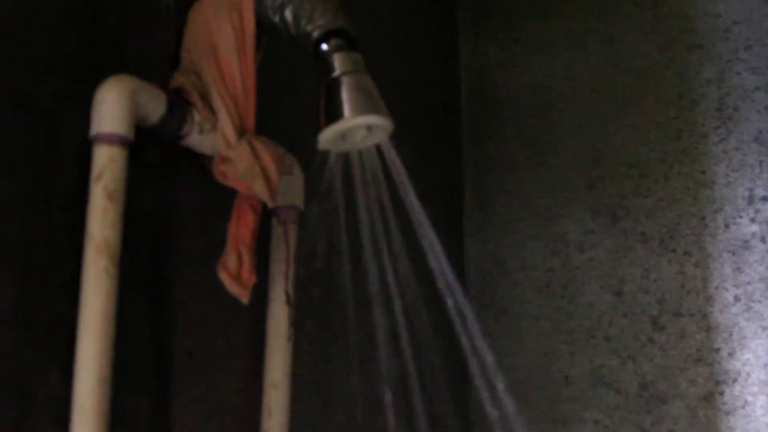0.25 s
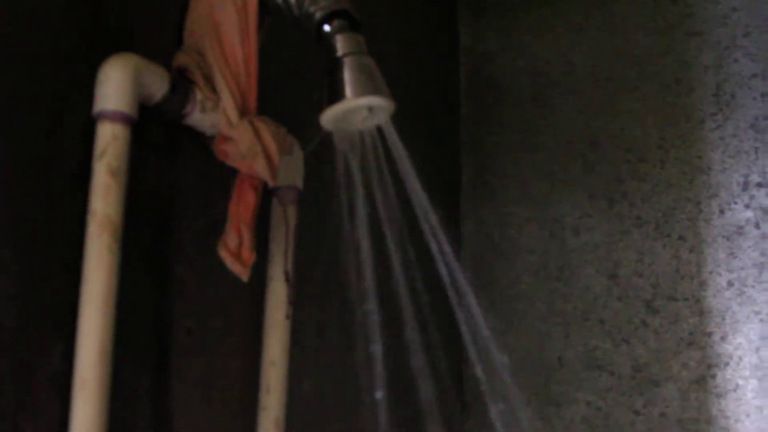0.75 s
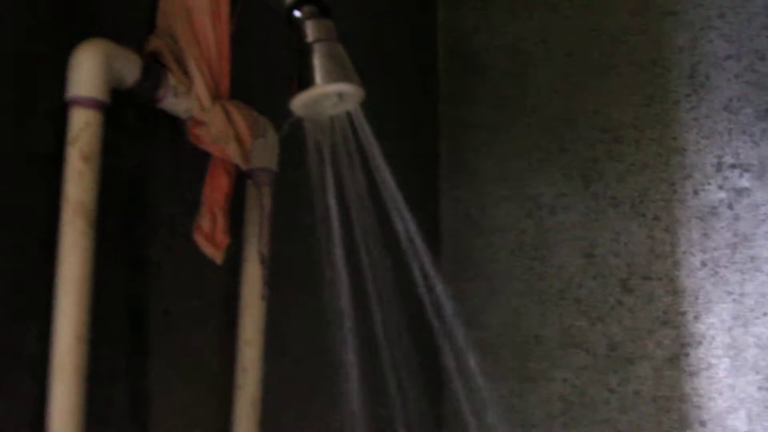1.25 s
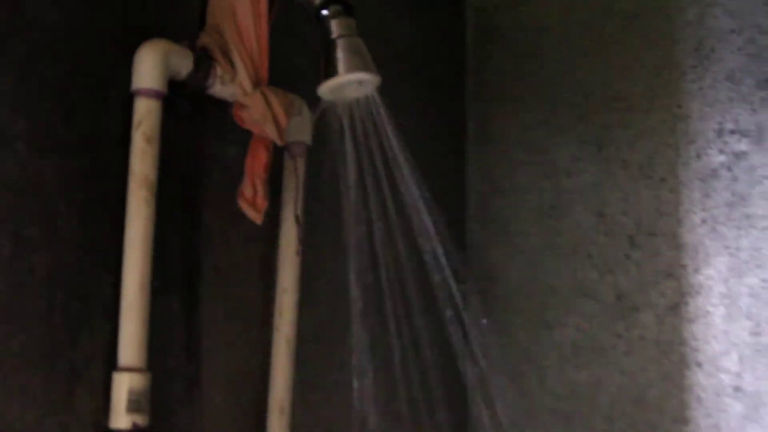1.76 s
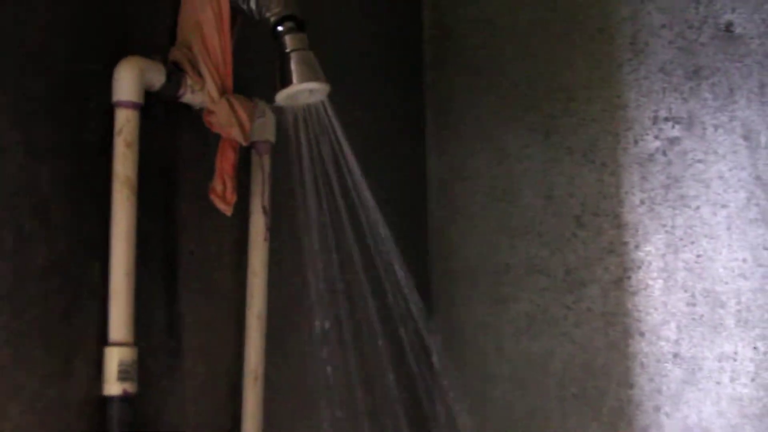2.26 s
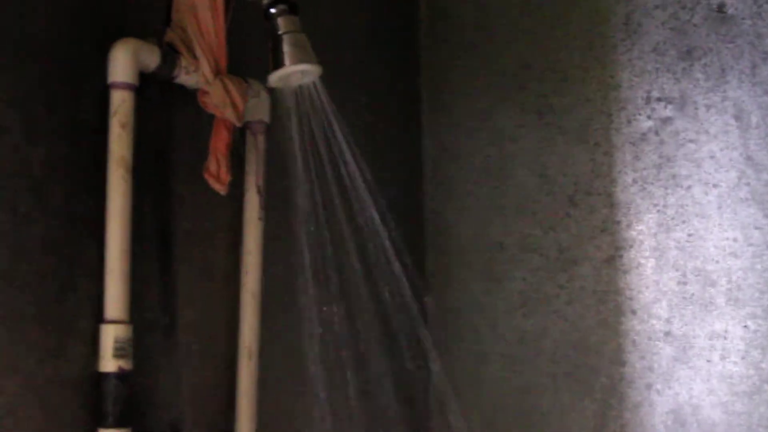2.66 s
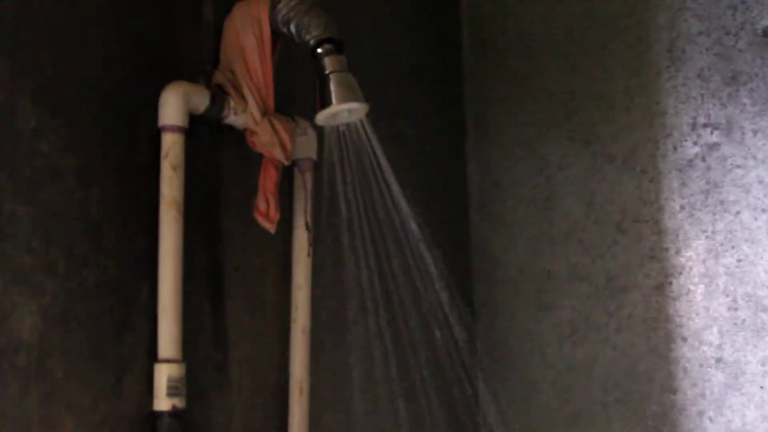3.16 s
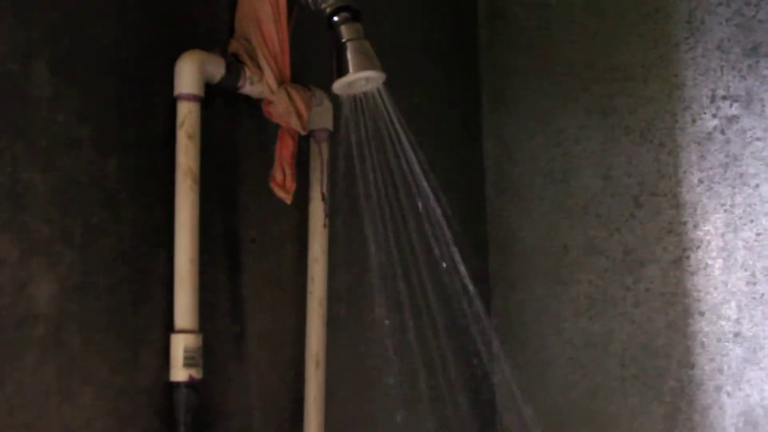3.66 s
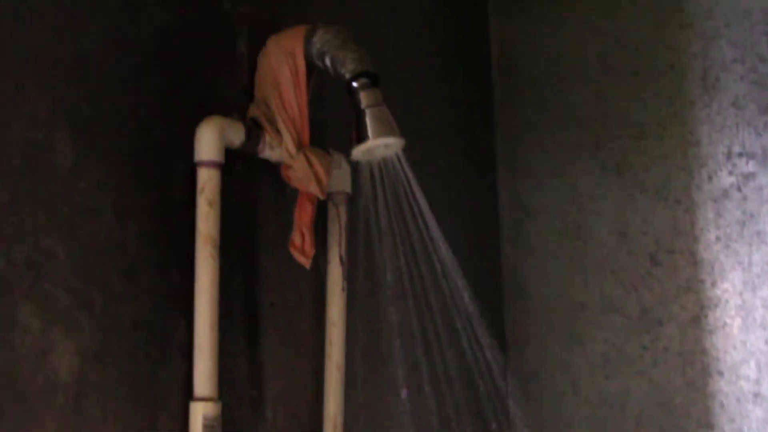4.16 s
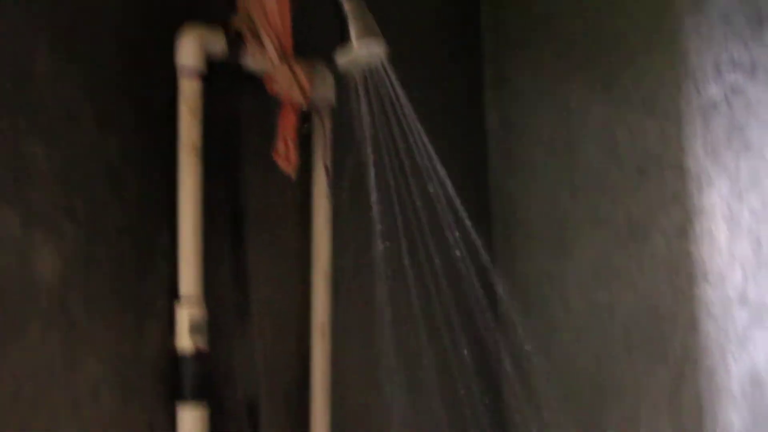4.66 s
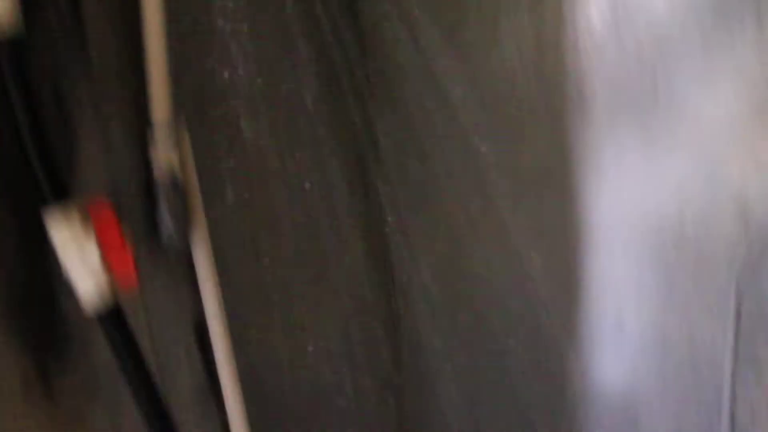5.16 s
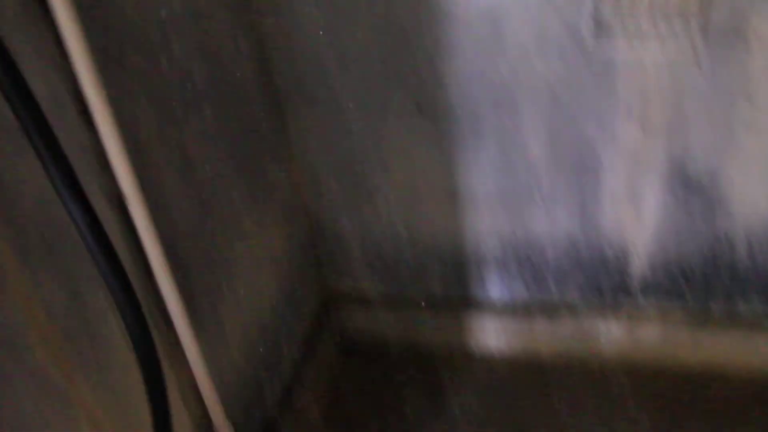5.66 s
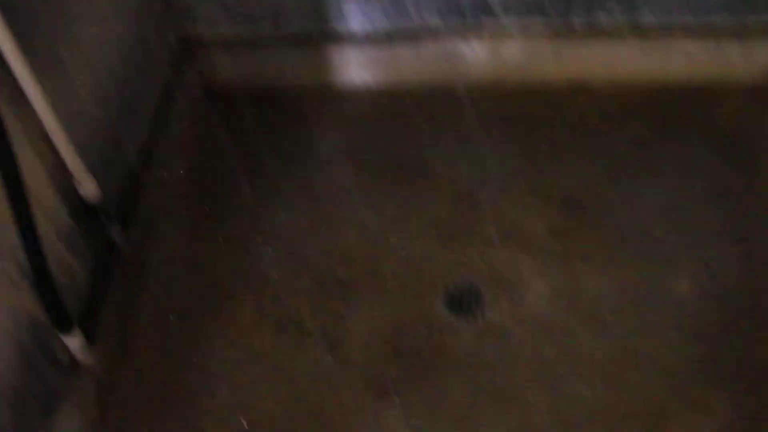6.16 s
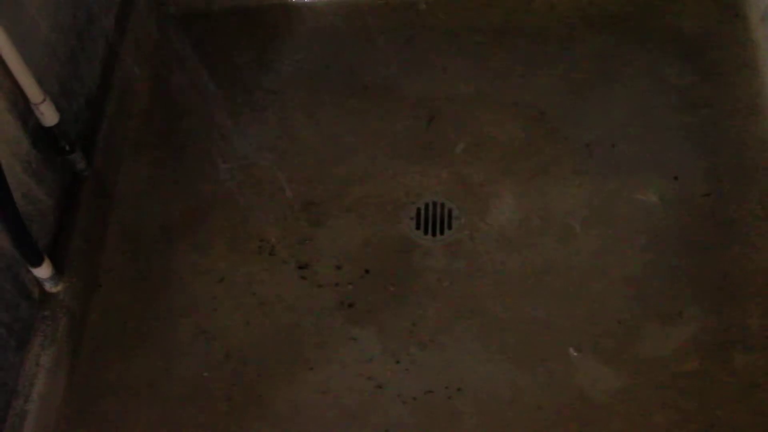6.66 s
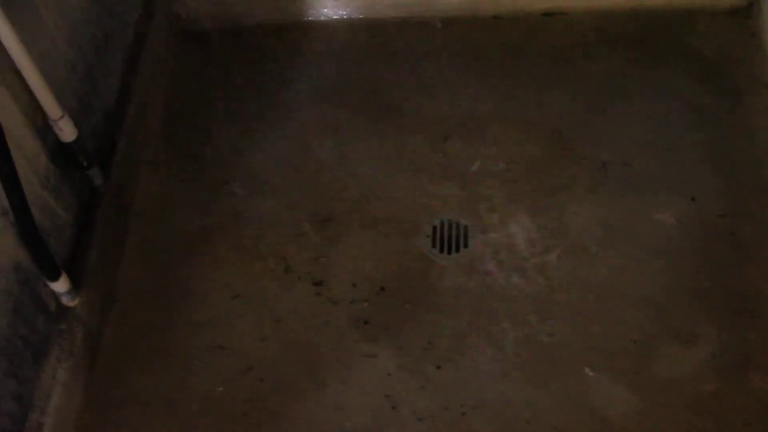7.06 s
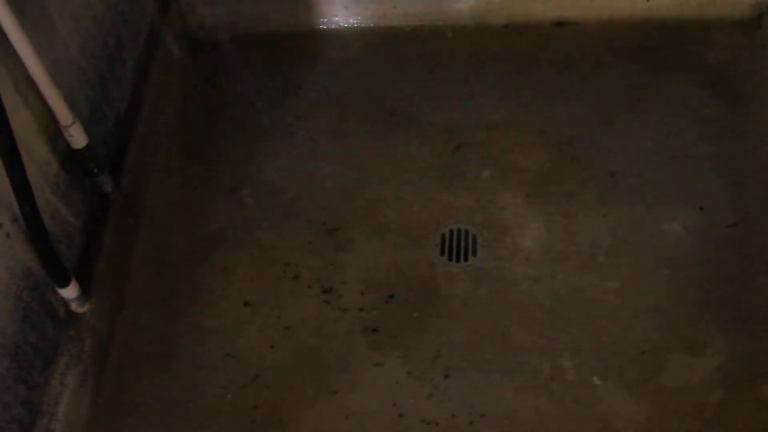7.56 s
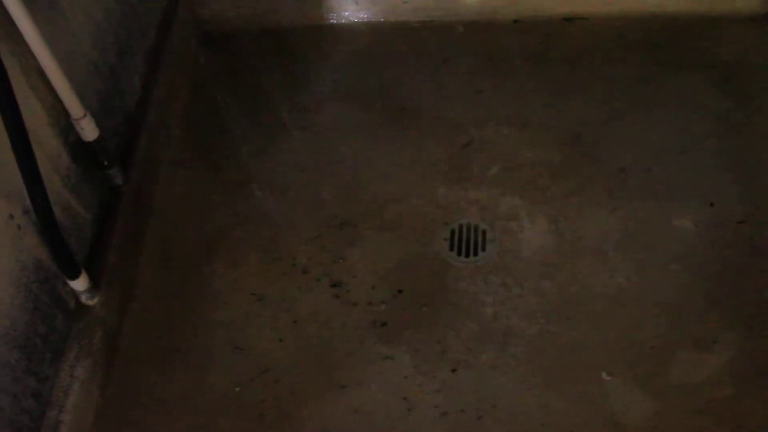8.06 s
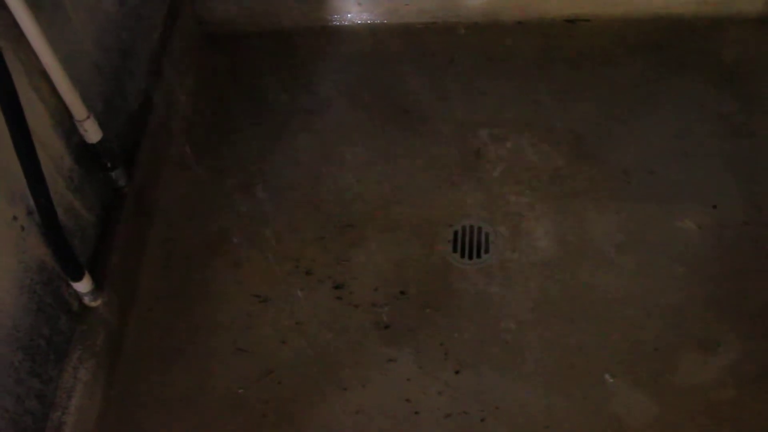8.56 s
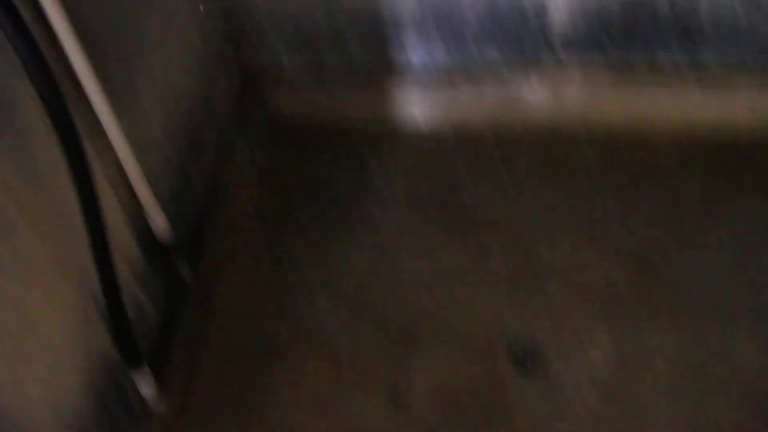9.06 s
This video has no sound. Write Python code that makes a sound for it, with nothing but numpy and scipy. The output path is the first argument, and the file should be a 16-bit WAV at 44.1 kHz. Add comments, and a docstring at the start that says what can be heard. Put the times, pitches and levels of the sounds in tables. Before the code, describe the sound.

Fizzing shower spray with uneven pressure slaps and splashes into a shallow puddle on concrete in a small bathroom.

```python
"""Sputtering shower on concrete

A shower on uneven pressure hits a bare concrete floor. Fine drops fizz, trapped air chokes the flow
and bursts out in spurts, and heavier slugs slap the puddle. The hard room answers and hums at its low
modes; something thuds softly far off in the building. One small microphone hears it all, and the water
turns hollow for about two seconds while it tips into the floor corner."""
import sys
import numpy as np
from scipy import signal
from scipy.fft import rfft, irfft, next_fast_len
from scipy.io import wavfile
from scipy.ndimage import uniform_filter1d, minimum_filter1d

SR = 44100
rng = np.random.default_rng(int(sys.argv[2]) if len(sys.argv) > 2 else 0)


def file_out(sig):
    """Save sig as 16-bit WAV at sys.argv[1]."""
    # one column per channel
    cols = np.atleast_2d(sig).T
    # limit, then scale
    lim = np.clip(cols, -1, 1)
    pcm = np.round(lim * 32767).astype(np.int16)
    wavfile.write(sys.argv[1], SR, pcm)


N = 410130

# Strength of the stream: (time [s], fine spray [dB], splash in the puddle [dB])
STREAM_LEVELS = [(0, -22, -17.5), (0.45, -17.5, -32.5), (0.8, -18, -25.5), (1.2, -18.5, -26.5),
                 (1.7, -18, -25.5), (2.0, -19.5, -40), (2.75, -20, -28), (3.3, -19.5, -25.5),
                 (3.85, -17.5, -49), (4.6, -19.5, -31.5), (5.1, -20.5, -30.5), (5.75, -21, -31),
                 (6.4, -20, -20), (7.0, -21, -32.5), (7.45, -20, -29.5), (8.2, -22.5, -22), (8.7, -19, -62),
                 (9.3, -22, -33)]
# How far the microphone tips into the floor corner: (time [s], share [0-1])
MIC_TILT = [(0, 0.06), (5.6, 0.08), (6.0, 0.8), (7.5, 0.8), (7.8, 0.15), (9.3, 0.07)]


def amp(db):
    return 10 ** (np.asarray(db) / 20)


def unit(x):
    return x / np.sqrt(np.mean(x ** 2) + 1e-20)


def along(points, hz):
    """Reads (Hz, value) points on a log frequency axis."""
    f, values = np.transpose(points)
    return np.interp(np.log(hz + 1), np.log(f + 1), values)


def curves(rows):
    """One value per sample for each column after the time."""
    times, *columns = np.transpose(rows)
    return [np.interp(np.arange(N) / SR, times, column) for column in columns]


def filtered(x, response):
    """Shapes x by a gain given as a function of frequency."""
    size = next_fast_len(len(x) + 8192)
    return irfft(rfft(x, size) * response(np.fft.rfftfreq(size, 1 / SR)), size)[:len(x)]


def lift(peaks, hz):
    """Gain of a few resonant peaks and dips."""
    return amp(sum(db / (1 + ((hz - centre) / width * 2) ** 2) for centre, width, db in peaks))


def add(track, at, sound):
    track[round(at * SR):][:len(sound)] += sound


def swell(t60, rise):
    """Quarter-second envelope: quick rise, exponential fall, both in seconds."""
    t = np.arange(SR // 4) / SR
    return (1 - np.exp(-t / rise)) * amp(-60 * t / np.clip(t60, .003, 1))


def noise_band(centre_hz, octaves):
    """A quarter second of noise around one frequency; rms 1."""
    noise = rng.standard_normal(SR // 4)
    return unit(filtered(noise, lambda hz: np.exp(-.5 * (np.log2((hz + 1) / centre_hz) / octaves) ** 2)))


def sputter(rate, t60, rise):
    """Small random surges that start fast and die away; centred on zero, softly bounded."""
    kicks = rng.random(N) * (rng.random(N) < rate / SR)
    surges = signal.fftconvolve(kicks, swell(t60, rise))[:N]
    return 2 * np.tanh(unit(surges - surges.mean()) / 2)


def tipped(x, response):
    """Crossfades into the corner's response as the microphone tips down."""
    share = curves(MIC_TILT)[0]
    return (1 - share) * x + share * filtered(x, response)


def hollow_corner(hz):
    """The floor corner colours the water with resonances and a comb of short echoes."""
    # Hollow colour: (centre [Hz], width [Hz], lift [dB])
    colour = [(770, 340, -8.5), (3250, 250, 2), (4240, 1000, 1), (5650, 610, -1), (7000, 680, 4.5)]
    # Echoes off the nearest walls: (delay [s], gain [linear])
    echoes = [(.00056, -.1), (.00195, -.11), (.0035, -.12)]
    comb = 1 + sum(gain * np.exp(-2j * np.pi * hz * delay) for delay, gain in echoes)
    return lift(colour, hz) * comb


def far_thuds():
    """Soft blows ring the low modes of the floor slab, roughened by a dull rumble."""
    # Blows: (time [s], ring [dB], rumble [dB], rumble centre [Hz])
    blows = [(0.031, -48, -35, 333), (0.072, -45.5, -42, 220), (1.357, -31.5, -40, 278)]
    # Slab modes: (pitch [Hz], relative level [dB], t60 [s])
    slab_modes = [(136, 6, 0.3), (101, -1, 0.26)]
    out, t = np.zeros(N + SR), np.arange(SR // 4) / SR
    ring = sum(amp(db - 60 * t / t60) * np.sin(2 * np.pi * hz * t) for hz, db, t60 in slab_modes)
    attack = 1 - np.exp(-t / .0072)
    for at, ring_db, rumble_db, centre_hz in blows:
        rumble = noise_band(centre_hz, octaves=.6) * amp(-60 * t / .3)
        add(out, at, (amp(ring_db) * ring + amp(rumble_db) * rumble) * attack)
    return out[:N]


def room_drone():
    """The low wash of falling water, lifted at the room's modes; a narrow hum comes and goes."""
    # Level rides: (time [s], wash [dB], hum [dB])
    levels = [(0.0, -43, -48), (0.28, -50.5, -61), (1.27, -51.5, -62), (1.55, -48.5, -56),
              (1.89, -49.5, -51), (2.0, -51.5, -69), (3.15, -57.5, -76), (3.3, -50.5, -58), (3.7, -52, -78),
              (4.6, -54, -62.5), (5.45, -51.5, -60), (6.09, -50.5, -63), (7.07, -52, -74), (7.35, -52, -76),
              (9.3, -54, -68)]
    # Tone of the wash: (frequency [Hz], relative level [dB])
    wash_tone = [(30, -28), (60, -19), (104, -13), (205, -14), (324, -5.5), (520, -6.5), (900, -5),
                 (2500, -38)]
    # Low room modes: (centre [Hz], width [Hz], lift [dB])
    room_modes = [(120, 33, 4), (506.4, 8.2, 11.5)]
    # How the modes shift in the corner: (centre [Hz], width [Hz], lift [dB])
    corner_modes = [(167, 11, 11.5), (266, 38, 10), (415, 90, 8), (750, 370, -11)]
    hum_hz, hum_width_hz = 319, 19
    wash_db, hum_db = curves(levels)
    wash = filtered(rng.standard_normal(N), lambda hz: amp(along(wash_tone, hz)) * lift(room_modes, hz))
    wash = tipped(unit(wash), lambda hz: lift(corner_modes, hz))
    hum = filtered(rng.standard_normal(N), lambda hz: 1 / (1 + ((hz - hum_hz) / hum_width_hz * 2) ** 2))
    surge_db = 2.6 * sputter(rate=9.9, t60=.51, rise=.03)
    return amp(wash_db + surge_db) * wash + amp(hum_db) * unit(hum)


def room_reverb(x):
    """Hard walls hold the lows longest; a smooth, diffuse tail, redrawn every third of a second."""
    # Decay of the room: (frequency [Hz], t60 [s])
    decay_times = [(200, 1), (2000, 0.2), (12000, 0.03)]
    out, step, predelay_s = np.zeros(N + 2 * SR), SR // 3, .005
    for start in range(0, N, step):
        hz, t, noise = signal.stft(rng.standard_normal(SR // 2), SR, nperseg=256)
        decay = amp(-60 * t / along(decay_times, hz)[:, None])
        tail = signal.istft(noise * decay, SR, nperseg=256)[1]
        wet = signal.fftconvolve(x[start:start + step], tail / np.linalg.norm(tail))
        add(out, start / SR + predelay_s, wet)
    return out[:N]


def near_drops():
    """Single drops close by: dry ticks, and drips whose trapped bubble rings."""
    # Dry ticks: (time [s], level [dB], centre [Hz])
    ticks = [(6.1523, -9.5, 6460), (6.214, -8, 13300), (8.063, -9, 8600), (8.799, -4, 12600),
             (9.0234, -9, 14100), (9.2766, -8, 13100)]
    # Pitched drips: (time [s], level [dB], pitch [Hz])
    drips = [(4.3, -39, 770), (5.455, -35, 1460), (7.762, -33, 1500), (9.047, -39, 1130)]
    out, t = np.zeros(N + SR), np.arange(SR // 4) / SR
    for at, db, hz in ticks:
        add(out, at, amp(db) * noise_band(hz, octaves=.38) * swell(.022, rise=.0002))
    for at, db, hz in drips:
        bubble = np.sin(2 * np.pi * hz * t * (1 + .097 * t))
        add(out, at, amp(db) * bubble * swell(.13, rise=.00099))
    return out[:N]


def patter(tone, rate, spread_db, impact_gain, patchy_db):
    """Single impacts of scattered size over the patchy hiss of countless finer ones; rms 1."""
    sizes = amp(spread_db * np.minimum(rng.exponential(1, N), 2)) * rng.standard_normal(N)
    impacts = unit(sizes * (rng.random(N) < rate / SR))
    noise = signal.stft(rng.standard_normal(N + SR), nperseg=256)[2]
    patches = uniform_filter1d(uniform_filter1d(rng.standard_normal(noise.shape), 8, 0), 8, 1)
    hiss = unit(signal.istft(noise * amp(patchy_db * unit(patches)), nperseg=256)[1][:N])
    return unit(filtered(impact_gain * impacts + hiss, lambda hz: amp(along(tone, hz))))


def air_choke():
    """Dips in dB: the flow fades steadily while trapped air gathers, then snaps back."""
    # Lulls in the flow: (return time [s], depth [dB], fade length [s])
    lulls = [(0.194, 10, 0.047), (0.76, 5, 0.12), (2.661, 6.5, 0.082), (2.971, 5.5, 0.064),
             (4.0, 2.5, 0.14), (4.155, 4, 0.23), (4.57, 6, 0.11), (6.15, 29, 0.086), (6.256, 7.5, 0.18),
             (7.03, 0, 0.069), (7.255, 15, 0.048), (7.649, 8.5, 0.19), (8.841, 6, 0.048)]
    t, return_s = np.arange(0, N / SR, .001), .004
    dip_db = sum(np.interp(t, [at - fade, at, at + return_s], [0, -db, 0]) for at, db, fade in lulls)
    return np.interp(np.arange(N) / SR, t, dip_db)


def flooding():
    """Envelopes of splash and slosh: the surging stream plus gushes that rise, sag and drain."""
    # Heavy water floods the puddle: (time [s], splash [dB], slosh [dB], hold [s])
    gushes = [(0.234, -22, -70, 0.15), (5.767, -35, -34.5, 0.095), (5.924, -20.5, -29.5, 0.21),
              (5.995, -25, -32.5, 0.18), (6.246, -30, -29, 0.064), (6.707, -24.5, -46, 0.15),
              (7.153, -18.5, -30.5, 0.15), (7.662, -23, -54, 0.019), ]
    attack_s, sag_db_per_s, drain_t60 = .0034, 27, .23
    surge_db = 2.9 * sputter(rate=30, t60=.13, rise=.002)
    splash_db = curves(STREAM_LEVELS)[1] + surge_db
    slosh_db = -42 - 2.5 * curves(MIC_TILT)[0] + .5 * surge_db  # softer when facing the corner
    envelopes = np.pad(amp([splash_db, slosh_db] + air_choke()), ((0, 0), (0, SR)))
    t = np.arange(SR // 2) / SR
    for at, gush_splash_db, gush_slosh_db, hold in gushes:
        fall_db = sag_db_per_s * t + 60 * np.maximum(t - hold, 0) / drain_t60
        gush = (1 - np.exp(-t / attack_s)) * amp(-fall_db)
        add(envelopes[0], at, amp(gush_splash_db) * gush)
        add(envelopes[1], at, amp(gush_slosh_db) * gush)
    return envelopes[:, :N]


def puddle():
    """The stream lands on the wet floor: a bright splash over a deeper slosh."""
    # Tone of the splash: (frequency [Hz], relative level [dB])
    splash_tone = [(100, -89), (1200, -19), (2200, -10), (3800, -3.5), (6000, -2), (10000, -6), (15700, -4)]
    # Tone of the slosh: (frequency [Hz], relative level [dB])
    slosh_tone = [(100, -48), (450, -11), (850, -9), (1400, -5), (2200, -4.5), (4000, -13.5)]
    splashing, sloshing = flooding()
    splash = patter(splash_tone, rate=1900, spread_db=3.5, impact_gain=.35, patchy_db=2)
    slosh = patter(slosh_tone, rate=300, spread_db=6, impact_gain=.35, patchy_db=1.5)
    return splashing * splash + sloshing * slosh


def slaps():
    """Each slug of water smacks, rings and spatters; trapped air bubbles and its tail lands late."""
    # Slugs hitting the floor: (time [s], level [dB], centre [Hz])
    slugs = [(0.09, -21.5, 3900), (0.159, -25.5, 2960), (0.297, -24, 3700), (0.34, -25, 3900),
             (0.939, -21, 5370), (1.056, -27, 3820), (1.255, -25, 4950), (1.522, -29, 4800),
             (1.741, -26, 3580), (2.223, -24.5, 5720), (2.257, -30.5, 3260), (2.982, -26, 3480),
             (3.248, -26.5, 5200), (3.3358, -22, 3750), (3.474, -28.5, 4780), (3.749, -26.5, 4540),
             (3.835, -26, 5480), (4.298, -31, 4270), (4.322, -26.5, 4430), (4.662, -25, 6000),
             (4.974, -22, 4500), (5.317, -22, 5800), (5.483, -28, 3470), (6.718, -22, 4350),
             (6.883, -28, 5200), (7.036, -28, 5000), (7.428, -30, 4130), (7.6634, -25.5, 3580),
             (7.737, -27.5, 4640), (7.871, -26.5, 3370), (7.9958, -30.5, 4640), (8.158, -25, 3500),
             (8.216, -23.5, 3790), (8.37, -25, 6200), (8.483, -25.5, 5360), (8.581, -29.5, 3300),
             (8.926, -26.5, 5530), (9.089, -23.5, 4230)]
    out, t = np.zeros(N + SR), np.arange(SR // 4) / SR
    smack_db, bubble_db, latest_tail_s = 6.5, -3, .03
    for (at, db, hz), (wide, wet, late, *sizes) in zip(slugs, rng.random((len(slugs), 6))):
        smack = amp(smack_db) * noise_band(hz, octaves=.55) * swell(.022, rise=.0003)
        narrow_band = noise_band(hz, octaves=.2 + .12 * wide)
        ring = narrow_band * swell(.1 + .15 * wet, rise=.001)
        spatter = noise_band(.91 * hz, octaves=.77) * swell(.1, rise=.0005)
        add(out, at, amp(db) * (smack + ring + spatter))
        for size in sizes:
            bubble_hz = hz * 2 ** (.6 * size - .4)
            chirp = np.sin(2 * np.pi * bubble_hz * t * (1 + t))
            add(out, at, amp(db + bubble_db) * chirp * swell(.06 + .1 * size, rise=.001))
        tail = narrow_band[::-1] * swell(.14, rise=.004)
        add(out, at + latest_tail_s * (1 + late) / 2, amp(db - 10 * wet) * tail)
    return out[:N]


def spray():
    """The fine jets break into fizzing drops; trapped air makes them spurt."""
    # Bursts from the shower head: (time [s], level [dB], t60 [s])
    spurts = [(0.085, -9, 0.079), (0.227, -2, 0.047), (0.58, -17, 0.16), (0.655, -12, 0.16),
              (1.186, -12, 0.1), (1.26, 0, 0.032), (1.977, -19, 0.08), (2.262, -7.5, 0.14),
              (2.305, -17, 0.052), (2.582, -8, 0.09), (2.865, 1, 0.042), (3.219, -13, 0.13),
              (3.342, -16, 0.13), (3.425, -13, 0.06), (3.607, -21, 0.044), (3.66, -24, .14),
              (3.849, -14, 0.12), (4.174, -7, 0.052), (4.262, 0, 0.027), (4.442, -11.5, 0.25),
              (4.612, -13, .08), (4.767, -10.5, 0.16), (4.978, -4, 0.04), (5.035, -12, 0.085),
              (5.168, -11, 0.17), (5.276, -15, 0.13), (5.447, -16.5, 0.19), (5.613, -10, 0.14),
              (5.988, -1, 0.1), (6.718, -15, 0.2), (7.038, -10, 0.071), (7.15, -7, 0.11),
              (7.322, -12, 0.11), (8.255, -10.5, 0.12), (8.365, -13, 0.073), (8.507, -11, 0.054),
              (8.765, -14, 0.11), (9.21, -10, 0.048)]
    # Tone of the fizz: (frequency [Hz], relative level [dB])
    fizz_tone = [(200, -49), (1500, -29), (4000, -12), (8000, -4.5), (10500, -1.5), (12800, 1), (14500, -2),
                 (15700, -10.5)]
    flow_db = curves(STREAM_LEVELS)[0] + air_choke()
    surge_db = 1.5 * sputter(rate=50, t60=.05, rise=.012)
    envelope = np.pad(amp(flow_db + surge_db), (0, SR))
    for at, db, t60 in spurts:
        add(envelope, at, amp(db) * swell(t60, rise=.011))
    return envelope[:N] * patter(fizz_tone, rate=3100, spread_db=2.5, impact_gain=.47, patchy_db=2)


def scene():
    """Water and its reverb over the drone and thuds, the same in both channels."""
    water = tipped(spray() + puddle() + slaps(), hollow_corner) + near_drops()
    mono = water + amp(-14) * room_reverb(water) + room_drone() + far_thuds()
    return np.array([mono, mono])


def record(dry):
    """A peak limiter catches the sharpest hits, then the very top of the treble is cut."""
    ceiling, top_hz = .85, 15750
    needed_gain = np.minimum(1, ceiling / (np.abs(dry) + 1e-9))
    gain = uniform_filter1d(minimum_filter1d(needed_gain, size=129), size=65)
    return np.array([filtered(side, lambda hz: hz < top_hz) for side in dry * gain])


dry = scene()
out = record(dry)
file_out(out)
```